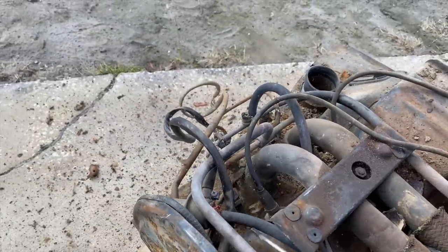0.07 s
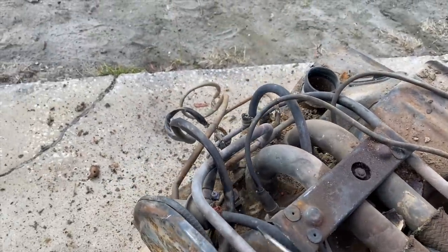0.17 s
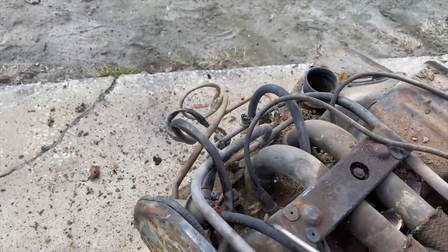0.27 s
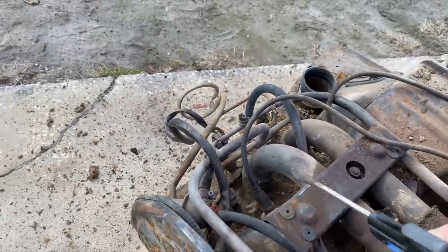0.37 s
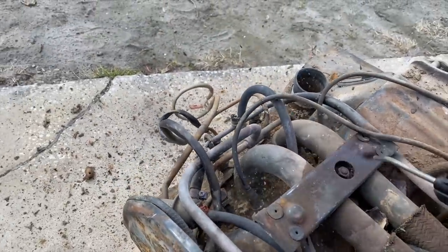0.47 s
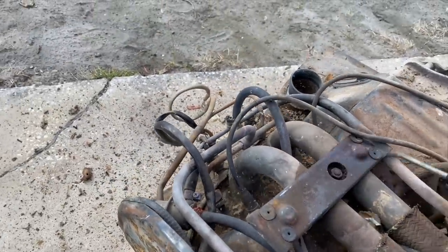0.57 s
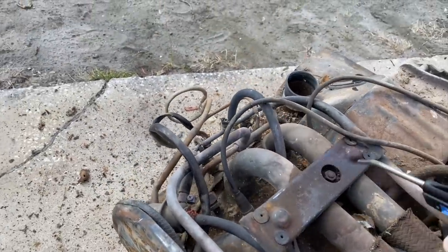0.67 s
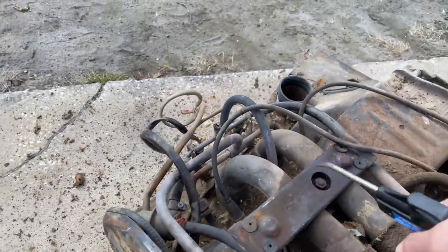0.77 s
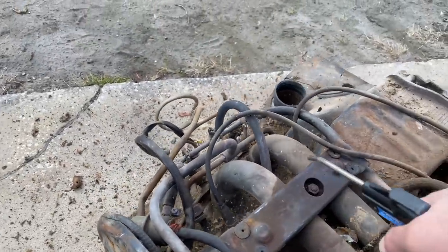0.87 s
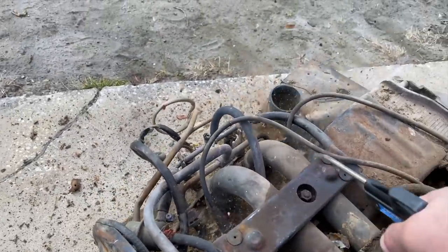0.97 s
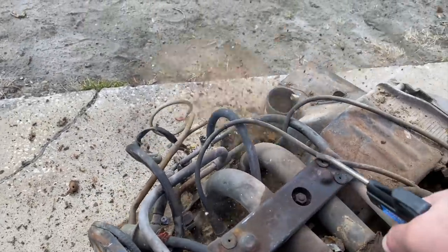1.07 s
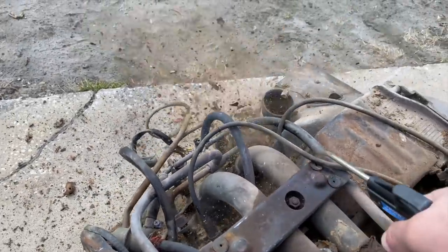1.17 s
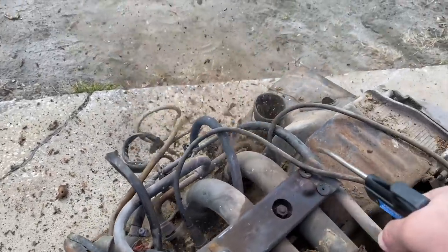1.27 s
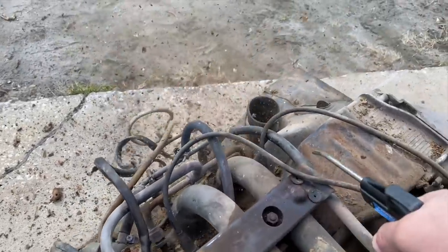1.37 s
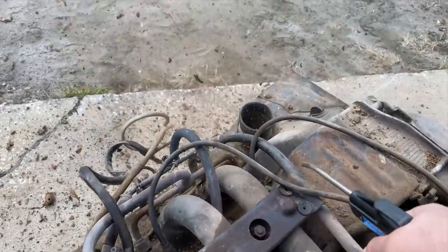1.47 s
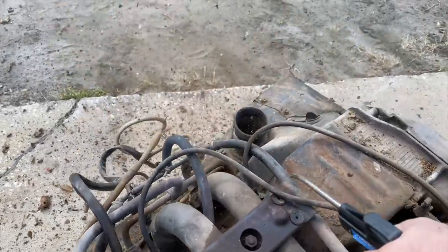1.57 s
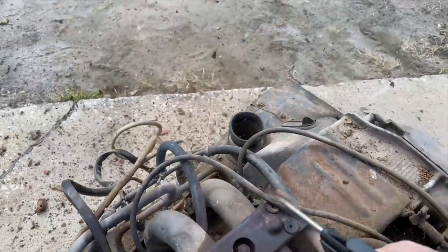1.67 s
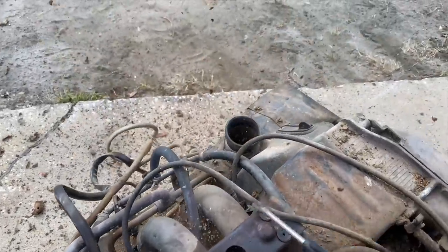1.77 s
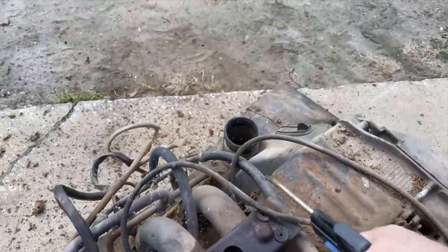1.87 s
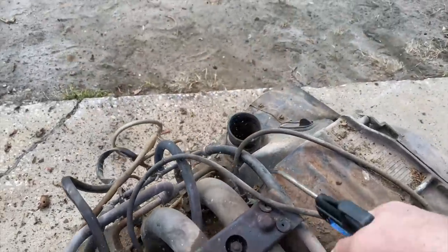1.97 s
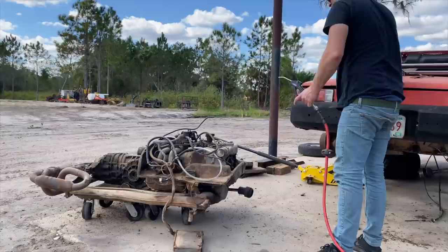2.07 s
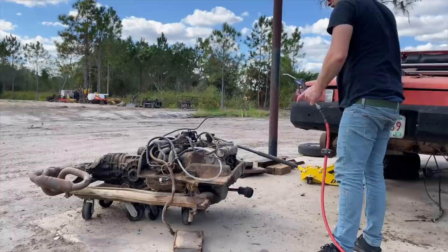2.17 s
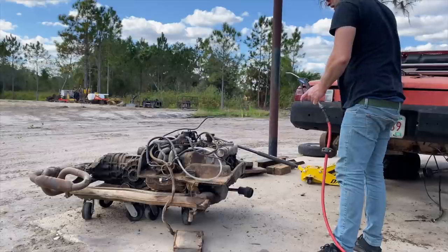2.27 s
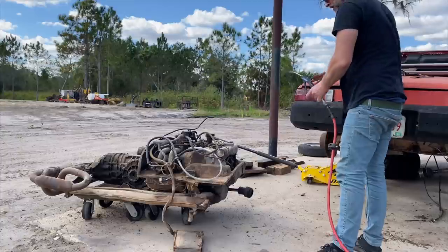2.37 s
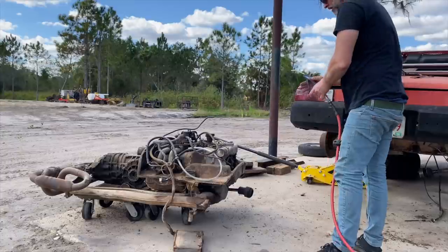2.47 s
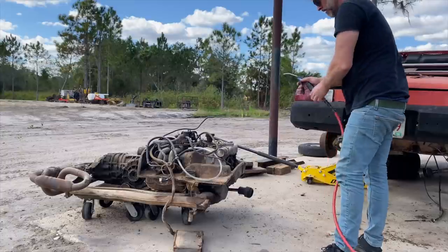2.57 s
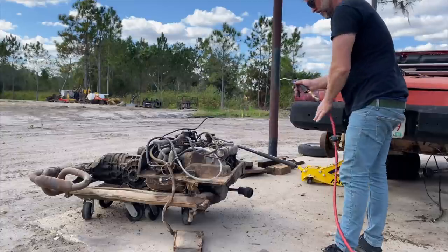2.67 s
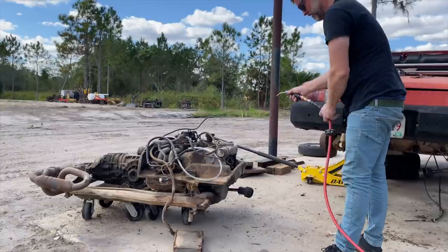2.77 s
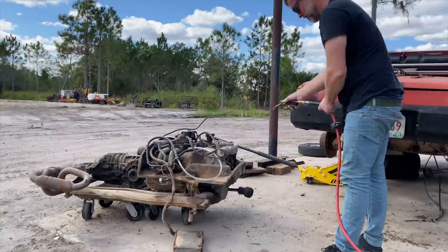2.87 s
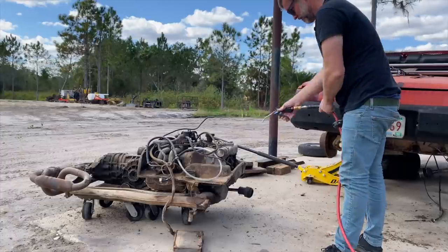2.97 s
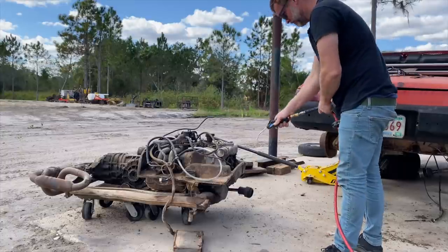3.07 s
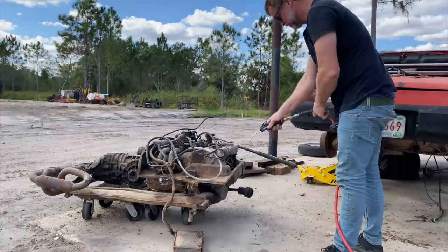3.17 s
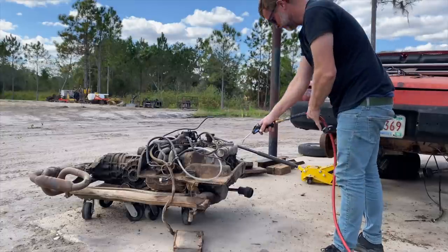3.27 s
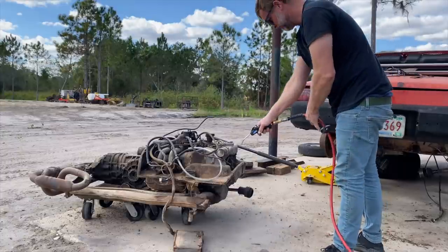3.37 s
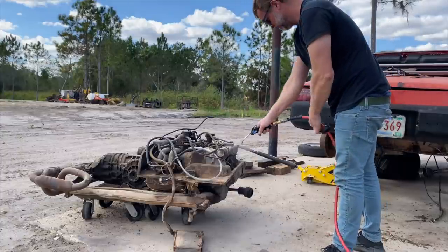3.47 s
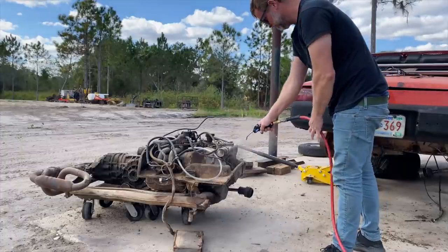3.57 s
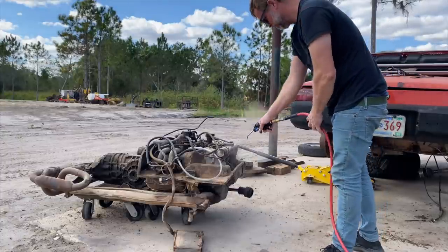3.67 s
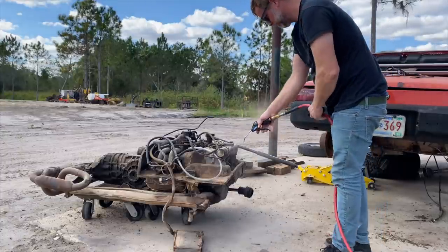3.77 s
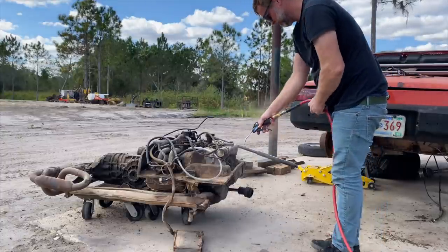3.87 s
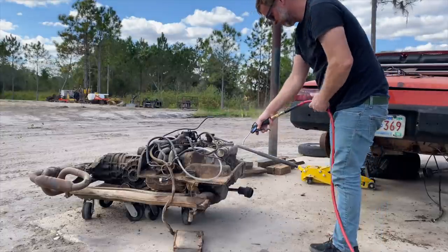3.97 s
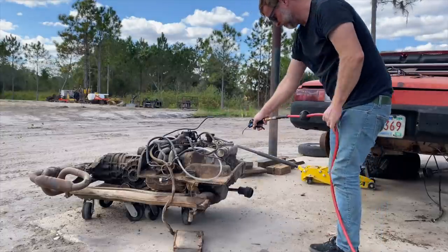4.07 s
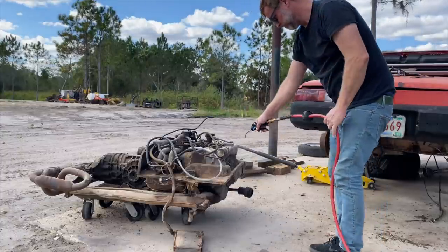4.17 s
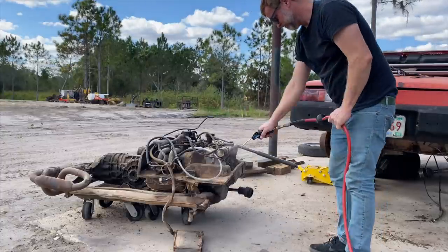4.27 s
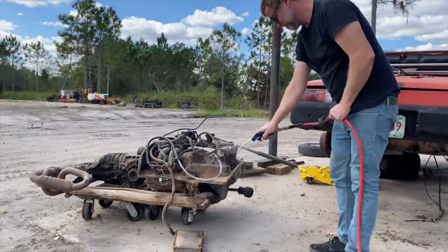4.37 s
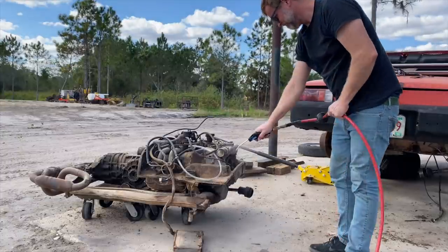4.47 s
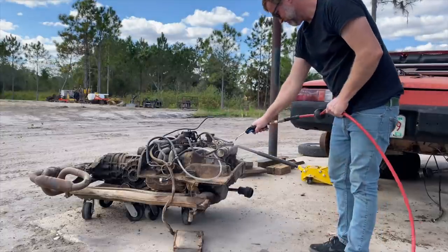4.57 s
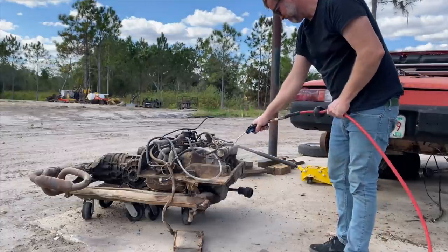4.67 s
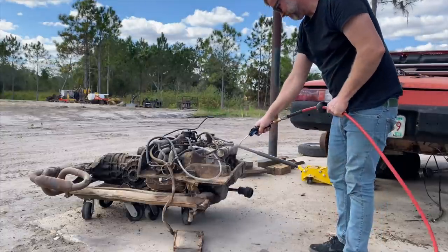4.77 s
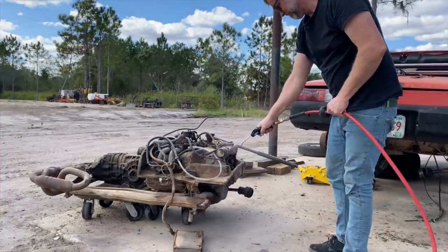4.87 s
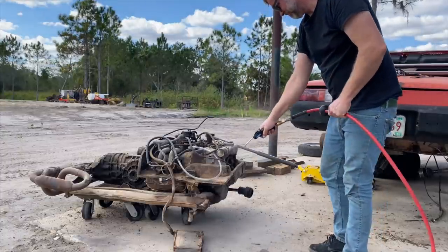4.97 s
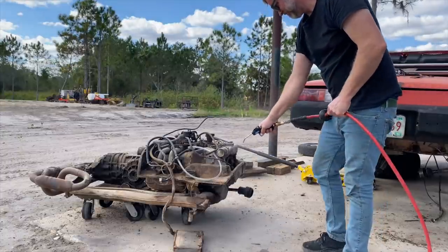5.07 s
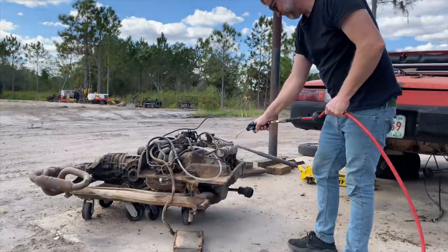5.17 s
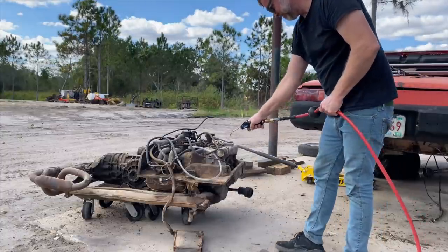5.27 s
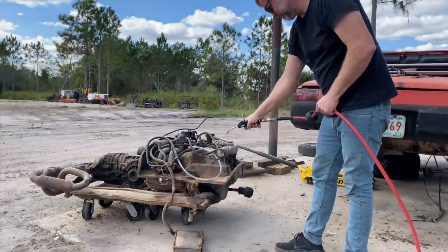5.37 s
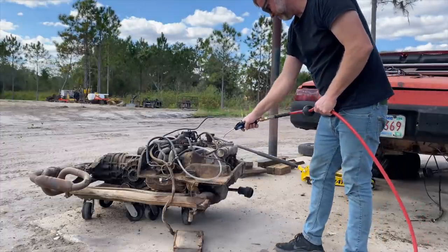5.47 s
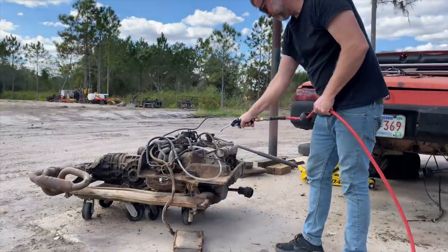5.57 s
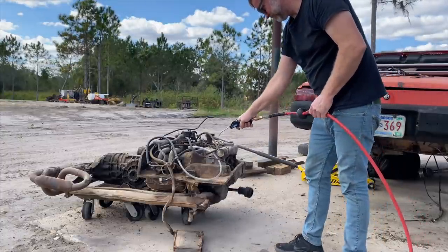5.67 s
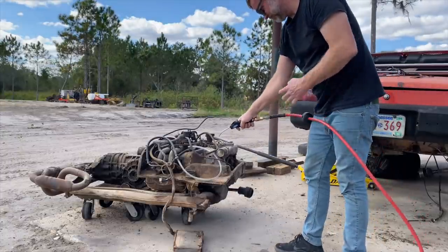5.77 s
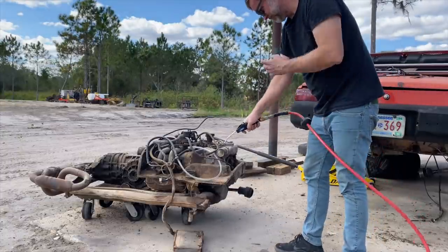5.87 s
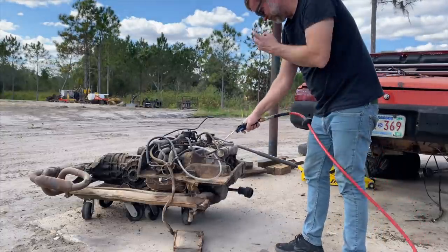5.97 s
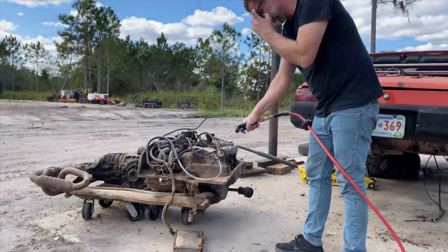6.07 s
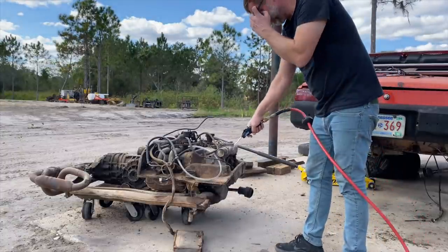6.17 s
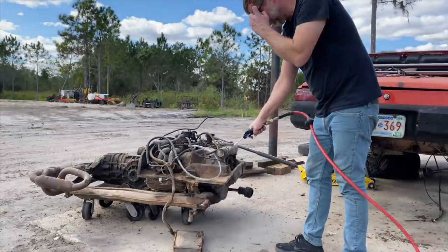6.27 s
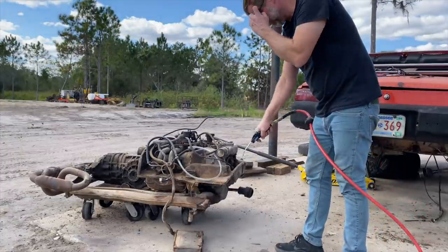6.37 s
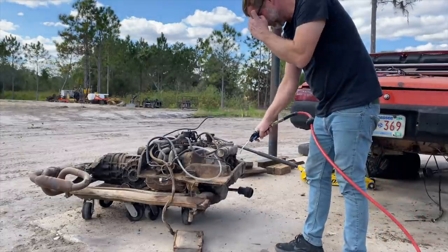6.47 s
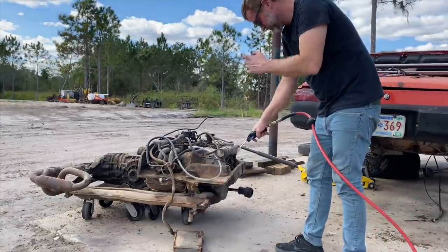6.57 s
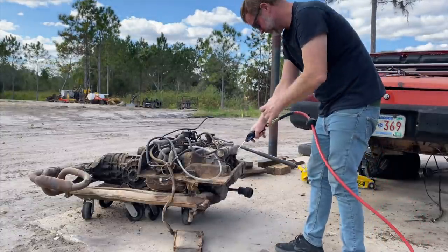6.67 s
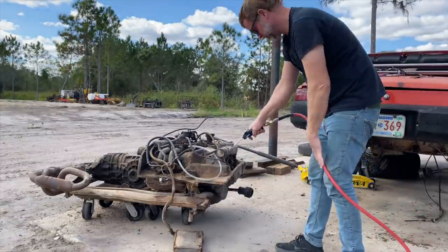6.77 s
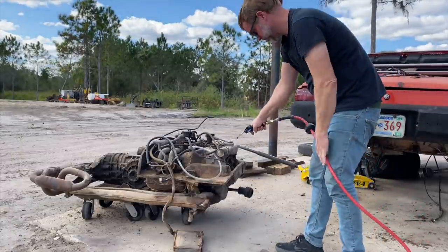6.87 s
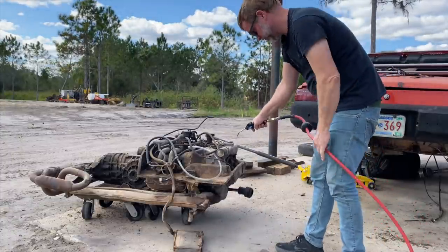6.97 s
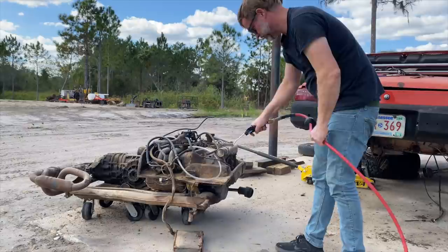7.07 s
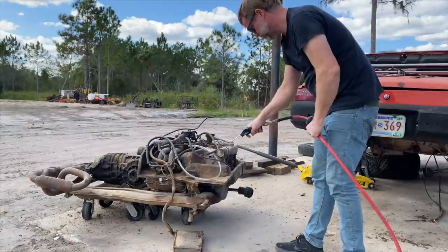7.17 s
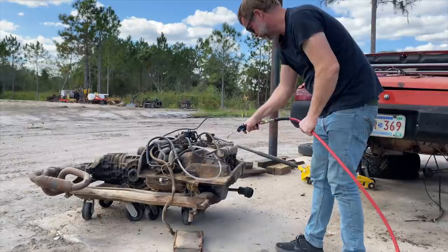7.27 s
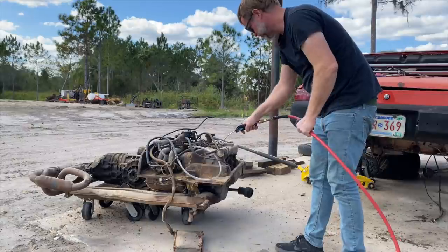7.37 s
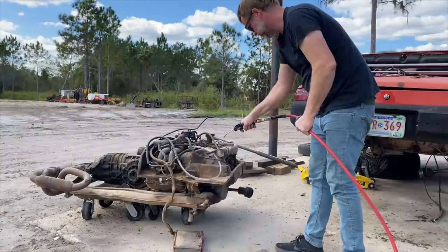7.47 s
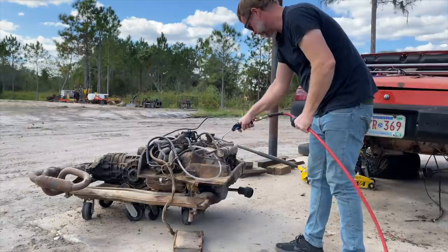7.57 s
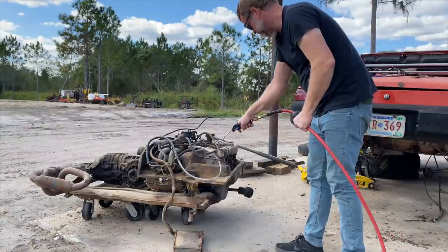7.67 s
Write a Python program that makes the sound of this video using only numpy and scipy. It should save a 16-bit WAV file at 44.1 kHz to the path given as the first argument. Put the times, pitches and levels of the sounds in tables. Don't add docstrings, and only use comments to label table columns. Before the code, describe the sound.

A compressed-air gun blows hard and close on a greasy engine, its bright hiss shifting as it crosses metal edges and hollows, with dull air thumps on the microphone. It cuts off around two seconds; small clicks tick in near quiet. Then a short burst, a medium burst, a brief rest, and a long sweeping blast heard from a few steps away in an open, dry yard.

```python
import sys
import numpy as np
from scipy import signal
from scipy.io import wavfile
from scipy.ndimage import uniform_filter1d

SR = 44100
rng = np.random.default_rng(int(sys.argv[2]) if len(sys.argv) > 2 else 0)


def magnitude_from_level(level_db):
    exponent = np.asarray(level_db, float) / 20
    return 10 ** exponent


def wav_record(signal):
    frames = np.transpose(np.atleast_2d(signal))
    bounded = np.clip(frames, -1, 1)
    quanta = np.round(bounded * 32767).astype(np.int16)
    wavfile.write(sys.argv[1], SR, quanta)


N = 341334

# frequency in Hz, density in dB per Hz.
YARD_SPECTRUM = [(200, -10.5), (400, -17.5), (750, -9.5), (1200, -15), (1700, -24), (3000, -30),
                 (6000, -42.5)]
LEAK_SPECTRUM = [(1200, -9.5), (2500, -7), (5000, -3.5), (8000, -4), (11800, -1), (14000, -7.5),
                 (16000, -30.5)]
WIND_SPECTRUM = [(25, -39.5), (45, -23), (70, -4), (100, 1), (150, -5), (250, -4.5), (500, -51)]
DRUM_SPECTRUM = [(100, -20), (170, -3), (250, 0), (380, -4), (600, -11), (1200, -30)]
NOZZLE_SPECTRUM = [(1500, -36.5), (3000, -19), (5600, -10.5), (9500, -6), (11800, 0), (13200, -4),
                   (14500, -7), (16000, -10.5)]
SPLASH_SPECTRUM = [(500, -35.5), (1300, -6), (2500, 0), (5600, -2.5), (7000, -2), (12000, -4.5)]
ROAR_SPECTRUM = [(150, -32.5), (350, -13.5), (600, -2.5), (1100, 3), (1500, -3), (2500, -9.5)]
# start in seconds, end in seconds, yard rumble in dB,
# its fading in dB per second, leak hiss in dB.
PAUSES = [
    (2.11, 2.733, -57, 15, -70.5),
    (2.92, 3.04, -75, .1, -60.5),
    (3.718, 4.103, -73, 9.5, -73.5),
    (4.12, 4.21, -79.5, -1, -76.5),
]
# start in seconds, length in seconds, leak hiss in dB, rumble in dB.
SPITS = [
    (2.466, 0.2, -66, -68),
    (2.6, .03, -59, -68),
    (2.65, 0.2, -71, -91),
    (3.021, .03, -61, -70),
    (3.725, 0.079, -70, -81),
    (3.92, 0.06, -74, -84),
    (4.1, .03, -68, -78),
    (4.18, 0.022, -71, -85),
]
# time in seconds, peak in dB, ring in Hz,
# share of bright click from 0 to 1, ring width in Hz.
TICKS = [(2.2004, -56, 1950, 0.7, 1500), (2.2205, -54, 2670, 0.9, 1500), (2.2565, -53, 1890, 0.9, 1500),
         (2.2864, -60, 1840, 0.9, 1500), (2.4605, -36, 3300, 0.4, 3000), (2.473, -43, 3600, 0.1, 3200),
         (2.5868, -37, 2200, 0.3, 1000), (2.5905, -32, 2200, 0.2, 1000), (2.5906, -34, 6000, 0.05, 2800),
         (2.5988, -25, 2400, 0.45, 950), (2.6005, -42, 6000, .1, 2000), (2.6042, -40, 2700, .1, 900),
         (2.6118, -29, 2400, 0.45, 1000), (2.612, -37, 5800, .1, 2500), (2.66, -44, 8500, 0.5, 2500),
         (2.488, -50, 3600, 0.1, 2000), (2.4925, -50, 2200, 0.4, 1500), (2.5425, -52, 11000, .8, 2000),
         (2.5505, -50, 10000, .8, 2000), (2.573, -50, 3500, 0.1, 3500), (2.581, -45, 2100, 0.5, 1000),
         (2.5955, -40, 9000, 0.5, 3000), (2.6085, -40, 8000, 0.5, 3000), (2.617, -44, 2700, .2, 1000),
         (2.62, -47, 4500, 0.3, 4000)]
# start in seconds, length in seconds, level in dB, centre in Hz, width in Hz.
RASPS = [
    (3.903, .009, -66, 12000, 5000),
    (3.903, 0.0069, -73, 2500, 2500),
    (3.917, .012, -64, 11000, 4500),
    (3.917, 0.035, -70, 5950, 250),
    (4.078, .014, -70, 5500, 3000),
    (4.099, .014, -68, 10000, 6020),
    (4.099, .013, -69, 3500, 4000),
    (4.17, 0.013, -64, 11500, 3500),
    (4.173, .016, -68, 5800, 1600),
]
# frequency in Hz, level in dB, 60 dB decay time in seconds.
PIPE_MODES = [
    (285, -65, 1.1),
    (600, -73, 1.1),
]
# time in seconds, length in seconds, level in dB.
WIND_GUSTS = [(.12, .24, -60), (.4, .15, -69), (0.51, .1, -48), (.66, .16, -56), (1.098, .14, -66),
              (1.675, 0.078, -50), (1.811, 0.071, -48), (2.198, 0.35, -57), (2.344, 0.15, -56),
              (2.467, .12, -60), (2.625, 0.51, -65), (3.074, 0.09, -63), (3.225, .1, -68), (2.9, .2, -66),
              (3.86, 0.3, -66), (4.032, 0.1, -55), (4.147, .2, -74), (4.278, 0.19, -59.5),
              (4.87, 0.18, -55), (5.502, .15, -75), (5.757, 0.22, -64), (5.902, 0.081, -48), (6.4, .3, -58),
              (6.56, 0.28, -50), (6.76, 0.28, -49), (6.953, 0.3, -49.5), (7.17, .16, -63), (7.288, .1, -58),
              (7.553, 0.31, -63), (7.68, 0.16, -47)]
# time in seconds, length in
# seconds, level in dB.
DRUMS = [(0.157, 0.3, -57), (0.555, 0.07, -42), (0.61, 0.1, -44), (0.661, .03, -43), (0.75, 0.15, -51.5),
         (1.087, 0.15, -54), (1.235, .1, -54), (1.672, 0.11, -44.5), (1.8, 0.051, -42.5), (2.4, .8, -63.5),
         (2.72, .14, -63), (3.32, 0.49, -55.5), (3.6, 0.25, -49), (4.287, 0.12, -44.5), (4.66, .14, -58),
         (4.744, 0.12, -52), (5.077, 0.4, -52), (5.364, 0.12, -57), (5.592, 0.19, -55), (5.897, 0.1, -68),
         (6.015, 0.062, -61), (6.125, 0.091, -53), (6.403, 0.14, -47), (6.534, 0.25, -52),
         (6.72, 0.18, -43.5), (6.776, 0.023, -40), (6.912, 0.3, -49.5), (7.3, 0.078, -58), (7.58, .1, -58),
         (7.71, .2, -60)]
# time in seconds, level in dB, starting pitch in Hz,
# clean thump relative to puff, final pitch as a share of the first.
SLAPS = [
    (0.4935, -30, 500, 4.5, .2),
    (0.5245, -29, 430, 3.4, .75),
    (0.537, -25, 750, .7, .7),
    (.566, -30, 450, 1.8, .8),
    (.598, -31, 900, .4, .6),
    (1.664, -35, 600, 1.5, .3),
    (1.8035, -35, 520, 3.5, .25),
]
# time in seconds, pitch in Hz, level in dB.
COVER_HUM = [(0, 1840, -46), (.7, 2050, -48), (.78, 2250, -44), (.87, 1950, -45), (1.1, 2150, -43),
             (1.42, 1780, -44), (1.62, 2100, -46), (1.72, 2000, -43), (1.83, 1850, -47), (1.93, 1700, -46),
             (2.05, 2150, -44), (2.11, 2050, -45)]
# start in seconds, length in seconds, level in dB,
# first pitch in Hz, last pitch in Hz.
SLIDES = [
    (6.28, .12, -42, 1900, 750),
    (6.11, .13, -43.5, 950, 550),
    (6.78, .1, -44, 1450, 1200),
    (7.06, .07, -43, 1900, 1300),
    (7.36, .06, -43, 2100, 1700),
    (4.37, .08, -46, 600, 1100),
    (1.5, .12, -42, 3700, 5000),
]
# start
# in seconds, length in seconds, level in dB, centre in Hz, width in Hz.
NEAR_CROSSINGS = [(.01, 0.074, -32.5, 5500, 3000), (.1, 0.25, -44, 2920, 350),
                  (.25, 0.14, -40.5, 1340, 540), (.29, 0.096, -44.5, 1190, 220),
                  (.385, 0.064, -42, 1450, 600), (.372, 0.11, -32, 5400, 2000),
                  (.494, 0.15, -21.5, 12900, 1490), (.68, 0.094, -35, 5800, 2800),
                  (.68, .1, -45, 3500, 300), (.494, .008, -34, 2200, 2000), (.537, .008, -33, 2200, 2000),
                  (.943, 0.2, -31.5, 12100, 1100), (1.163, 0.16, -31, 12600, 1100),
                  (1.047, 0.13, -39, 6050, 2500), (1.47, .15, -39, 4700, 1500),
                  (1.615, .08, -30, 12600, 1980), (1.694, 0.086, -45.5, 1920, 800),
                  (.52, 0.039, -37, 2300, 2000), (1.63, 0.045, -49, 1750, 500), (1.23, .3, -48, 1600, 400),
                  (2.58, 0.05, -60, 2400, 900), (2.525, .04, -66, 2000, 1200), (.352, .014, -36, 1230, 300),
                  (.53, .115, -39, 620, 550), (.405, .025, -38, 1350, 500), (.705, .045, -50, 500, 500),
                  (1.35, .25, -56, 420, 300)]
FAR_CROSSINGS = [(3.05, 0.1, -34, 5730, 700), (3.2, .36, -53, 1065, 296), (3.37, 0.22, -48.5, 245, 110),
                 (3.55, .155, -44, 248, 55), (3.555, .08, -49, 600, 90), (3.5, 0.19, -53, 440, 60),
                 (3.18, .12, -51, 550, 300), (3.41, 0.09, -47, 1000, 300), (3.185, .05, -49, 1020, 250),
                 (3.29, .05, -48, 1100, 200), (5.03, .16, -52, 240, 90), (4.27, .07, -44, 2000, 900),
                 (4.595, 0.056, -34, 2300, 1800), (5.395, 0.125, -33, 3000, 2600),
                 (5.646, 0.054, -35, 3080, 2500), (4.36, 0.15, -43, 575, 250),
                 (5.805, 0.052, -34.5, 2300, 2600), (5.906, 0.039, -36, 696, 500),
                 (5.978, 0.128, -33.5, 2500, 2520), (5.98, 0.044, -38, 1210, 700),
                 (6.465, 0.027, -38, 1300, 900), (6.236, 0.12, -36.5, 1950, 1470),
                 (6.55, 0.14, -47, 1020, 200), (6.771, 0.032, -36, 2860, 4000),
                 (7.018, .095, -37.5, 2600, 2600), (7.142, 0.04, -31, 2800, 3000),
                 (7.348, 0.14, -36, 3100, 2200), (7.49, .25, -45, 2660, 300),
                 (7.03, 0.19, -46.5, 2510, 160), (7.36, 0.1, -49, 2800, 350), (7.63, .11, -42.5, 1300, 600),
                 (5.02, .09, -49, 690, 300), (6.42, .06, -52, 620, 150), (4.695, .022, -38, 1800, 2000),
                 (4.322, .018, -36, 2600, 2500), (7.034, .012, -36, 2500, 600),
                 (7.235, .03, -40, 2500, 400), (6.19, .07, -51, 500, 250), (3.57, .09, -40, 6050, 400)]
# flow starts in seconds, full flow in seconds, flow begins to fall in seconds, first surge in dB, fall in dB
BURSTS = [
    (-.1, -.05, 2.105, 4, 4000),
    (2.727, 2.761, 2.9, 4, 709),
    (3.034, 3.063, 3.686, 8, 691),
    (4.209, 4.262, 7.8, 0.5, 700),
]
# time in seconds, hiss at the microphone in dB,
# aim at bare metal in dB, aim into hollows in dB.
AIM = [(0.0, -28, -9, -17.5), (.35, -27.5, -8, -23), (.56, -21, -10.5, -23), (.72, -26, -10.5, -26),
       (.9, -36, 1, -5.5), (1.3, -30.5, -3, -17), (1.7, -28, -10, -17.5), (1.94, -32.5, -4, -11.5),
       (2.1, -28.5, -4.5, -19), (2.76, -19, -9.5, -30), (2.9, -23, -12, -29), (3.13, -22, -11, -29),
       (3.22, -20, -12, -17), (3.7, -25, -11.5, -22), (4.3, -24.5, -7, -9), (5.1, -26.5, -9, -16),
       (6.5, -26, -10.5, -11), (7.74, -27.5, 0, -12.5)]
# time in seconds, length in
# seconds, hiss in dB, splash in dB, roar in dB.
SWEEPS = [(0.062, 0.11, 2.5, 6, 3), (0.198, 0.31, 3.5, -5.5, -2.5), (0.262, 0.1, -2, 9, 10),
          (0.397, 0.086, 2.5, 4, -1), (0.453, 0.033, 3.5, 4, -2), (0.498, 0.021, 1.5, -2, 11),
          (0.6, 0.21, -2.5, 0.5, 16.5), (0.695, .05, -3, -2, -8), (0.798, 0.15, -2.5, 5, 8),
          (0.906, 0.13, 3.5, -6, -22), (1.094, 0.24, 6, -4.5, -11.5), (1.56, 0.33, 0.5, 4, -7),
          (1.666, 0.16, 3, -3, 5), (1.796, .04, 4.5, -4, 5), (3.412, 0.36, 0.5, 3, 2.5),
          (3.53, .1, 0, 0, -4), (3.57, 0.15, 3, -5.5, 3), (3.67, .08, -.7, -2, 0), (3.0, .2, 1, 0, 0),
          (1.93, .12, 0, -2, 0),
          (4.33, 0.069, 3.5, 3.5, -0.3), (4.355, 0.056, 4, -12, -10), (4.515, 0.15, 0.5, 6.5, -0.5),
              (4.42, 0.13, -1, 2, -0.5), (4.7, .04, 1.5, 3.5, 0), (4.75, 0.096, 1, -1, -8),
              (4.85, 0.8, 1.5, -3.5, 1), (5.11, 0.38, -1, -1.5, 0), (5.25, 0.2, 1, 8.5, 4),
              (6.17, .1, 0, 2, 0), (5.39, 0.18, -2.5, 4, 4.5), (5.451, 0.12, 5, 4, -0.5),
              (5.57, .14, -1, 2.5, 2), (5.65, .05, 2, -6, -3), (5.68, 0.077, -1, 7, 8),
              (5.82, 0.069, -1, 10, 7), (5.865, 0.14, 3, -5, -6), (5.93, .06, 1.5, -1, 3),
              (6.012, 0.11, 3.5, 9, -4), (6.065, 0.09, 3.5, 8, -3), (6.19, 0.15, 0, -1, -4),
              (6.3, 0.12, 2, 6.5, -6), (6.42, 0.096, -1.5, 0, -8), (6.94, 0.18, -1.5, -3, -2),
              (6.78, 0.046, 2.5, 1, -2), (7.17, 0.19, 5, -1, -8), (7.21, .03, -1, -4, -5),
              (7.26, 0.09, 2, 4.5, -4.5), (7.42, 0.14, -3, 8, -1), (7.54, .12, 0, -1, -6),
              (6.55, .1, 0, 0, -3), (4.66, .1, 0, 0, -4)]
# time in seconds, centre in Hz.
SPLITS = [(.14, 5500), (1.02, 6300), (1.42, 7000), (1.56, 6300), (1.56, 8400), (1.6, 5200), (1.6, 14500),
          (2.02, 5000), (2.02, 7600), (4.27, 6700), (4.27, 15200), (4.42, 8000), (4.44, 7000), (4.51, 7000),
          (5.04, 12800), (5.11, 5800), (5.13, 7000), (5.29, 7300), (5.72, 4700), (5.72, 14200),
          (6.34, 4700), (6.43, 7000), (6.43, 10500), (6.74, 5200)]


def read(points, hz):
    f, value = np.transpose(points)
    return np.interp(np.log(hz + 1), np.log(f + 1), value, -90, -90)


def evened(x):
    return x / np.sqrt(np.mean(x ** 2) + 1e-20)


def turbulence(spectrum, size, patchy_db, flutter_db, streak_db=3.0):
    hop = size // 4
    frames, hz = N // hop + 5, np.fft.rfftfreq(size, 1 / SR)
    a, b, patches, streaks = rng.standard_normal((frames, len(hz), 4)).T
    streaks = uniform_filter1d(streaks, size=2, axis=0)
    streaks = evened(uniform_filter1d(streaks, size=20, axis=1))
    patches = uniform_filter1d(patches, size=size // 48, axis=0)
    patches = evened(uniform_filter1d(patches, size=12288 // size, axis=1))
    flutter = evened(uniform_filter1d(rng.standard_normal(frames), size=2048 // size))
    drift_db = patchy_db * patches + flutter_db * flutter + streak_db * streaks
    z = (a + 1j * b) * magnitude_from_level(read(spectrum, hz))[:, None] * magnitude_from_level(drift_db)
    return evened(signal.istft(z, nperseg=size, noverlap=size - hop)[1][:N])


def resonate(x, hz, width):
    turn = np.exp(2j * np.pi * np.cumsum(hz * np.ones(len(x))) / SR)
    r = np.exp(-np.pi * width / SR)
    return (turn * signal.lfilter([1], [1, -2 * r, r * r], x / turn)).real


def bumps(rows, heights, rise=0.51):
    t = np.arange(0, N + 16, 16)[:, None] / SR
    s, length = np.transpose(rows)[:2]
    away = np.where(t < s, (s - t) / rise, (t - s) / (1 - rise)) / length
    swells = np.cos(np.pi / 2 * np.minimum(away, 1)) ** 2
    return np.interp(np.arange(N) / SR, t[:, 0], swells @ heights)


def eddies(rows, glide):
    out, noise = np.zeros(N), rng.standard_normal(N)
    for s, length, db, hz, width in rows:
        start = round(s * SR)
        part = out[start:][:round(length * SR)]
        drifting = hz + glide * width ** 2 / 2000 * np.linspace(-1, 1, len(part))
        shed = evened(resonate(noise[start:][:len(part)], drifting, width))
        part += magnitude_from_level(db) * shed * signal.windows.tukey(len(part), 0.32)
    return out


def valve():
    opening_db_per_s, surge_s = 481.5, .04
    t, gain = np.arange(N) / SR, np.zeros(N)
    for start, full, stop, surge_db, closing in BURSTS:
        db = surge_db * np.exp(-abs(t - full) / surge_s)
        db = db - opening_db_per_s * np.maximum(full - t, 0)
        db = db - closing * np.maximum(t - stop, 0)
        gain += np.clip((t - start) / .004, 0, 1) * magnitude_from_level(db)
    return gain


def aimed(k):
    sweeps, aim = np.array(SWEEPS), np.transpose(AIM)
    return np.interp(np.arange(N) / SR, aim[0], aim[k]) + bumps(sweeps, sweeps[:, k + 1])


def yard():
    rumble = turbulence(YARD_SPECTRUM, size=1024, patchy_db=.7, flutter_db=.8, streak_db=2)
    leak = turbulence(LEAK_SPECTRUM, size=256, patchy_db=.5, flutter_db=.8)
    t = np.arange(N) / SR
    spit_hiss, spit_low = (bumps(SPITS, magnitude_from_level(db), rise=.03) for db in np.transpose(SPITS)[2:])
    out = spit_hiss * leak + spit_low * rumble
    for start, end, yard_db, fading, leak_db in PAUSES:
        gate = np.clip(np.minimum(t - start, end - t) / .01 + 1, 0, 1)
        rumble_level = magnitude_from_level(yard_db - fading * np.clip(t - start, 0, 1))
        out = out + gate * (rumble_level * rumble + magnitude_from_level(leak_db) * leak)
    return out


def ticks():
    out, t = np.zeros(N), np.arange(600) / SR
    scatter = rng.standard_normal((len(TICKS), len(t)))
    cracks = (t == 0) + 0.087 * scatter * magnitude_from_level(-60 * t / 0.0036)
    for (s, db, hz, bright, width), crack in zip(TICKS, cracks):
        snap = resonate(crack, 10500, 6500) + .28 * resonate(crack, 5300, 3500)
        ring = resonate(crack, hz, width)
        click = 1.7 * bright * snap / abs(snap).max()
        out[round(s * SR):][:len(t)] += magnitude_from_level(db) * (click + (1 - bright) * ring / abs(ring).max())
    return out


def grit():
    return eddies(RASPS, glide=0)


def pipe():
    t = np.maximum(np.arange(N) / SR - 3.69, 0)
    return sum(magnitude_from_level(db - 60 * t / t60) * np.sin(2 * np.pi * hz * t) for hz, db, t60 in PIPE_MODES)


def buffet():
    hum = turbulence(DRUM_SPECTRUM, size=1024, patchy_db=.8, flutter_db=1.6, streak_db=1.2)
    wind = turbulence(WIND_SPECTRUM, size=2048, patchy_db=1, flutter_db=2, streak_db=0.5)
    idle_db, below_hiss_db, calm_db = -76.5, -42.5, -75
    drumming = magnitude_from_level(idle_db) + valve() * magnitude_from_level(aimed(1) + below_hiss_db)
    drumming = drumming + bumps(DRUMS, magnitude_from_level(np.array(DRUMS)[:, 2]))
    gusting = magnitude_from_level(calm_db) + bumps(WIND_GUSTS, magnitude_from_level(np.array(WIND_GUSTS)[:, 2]))
    return drumming * hum + gusting * wind


def slaps():
    out, t = np.zeros(N), np.arange(2000) / SR
    puffs = rng.standard_normal((len(SLAPS), len(t)))
    shape = (1 - np.exp(-t / 0.0024)) * magnitude_from_level(-60 * t / 0.035)
    for (s, db, hz, thump, low), puff in zip(SLAPS, puffs):
        sinking = hz * (low + (1 - low) * np.exp(-t / .008))
        air = evened(resonate(puff, sinking + 250, 1300))
        tone = thump * np.sin(2 * np.pi * np.cumsum(sinking) / SR)
        out[round(s * SR):][:len(t)] += magnitude_from_level(db) * (air + tone) * shape
    return out


def cover():
    t, noise = np.arange(N) / SR, rng.standard_normal(N)
    s, hz, db = np.transpose(COVER_HUM)
    close_by = np.clip((2.11 - t) / .01, 0, 1)
    out = evened(resonate(noise, np.interp(t, s, hz), 900)) * magnitude_from_level(np.interp(t, s, db)) * close_by
    for s, length, db, from_hz, to_hz in SLIDES:
        start = round(s * SR)
        part = out[start:][:round(length * SR)]
        hz = np.geomspace(from_hz, to_hz, len(part))
        whistle = evened(resonate(noise[start:][:len(part)], hz, .3 * hz.mean()))
        part += magnitude_from_level(db) * whistle * signal.windows.tukey(len(part), .5)
    return out


def crossings():
    return eddies(NEAR_CROSSINGS, glide=0.39) + eddies(FAR_CROSSINGS, glide=.02)


def jet():
    nozzle = turbulence(NOZZLE_SPECTRUM, size=512, patchy_db=1.43, flutter_db=0.32, streak_db=2.8)
    splash = turbulence(SPLASH_SPECTRUM, size=512, patchy_db=1.2, flutter_db=1.2, streak_db=2.6)
    roar = turbulence(ROAR_SPECTRUM, size=1024, patchy_db=1.2, flutter_db=.7, streak_db=2.6)
    hiss, metal, hollows = (magnitude_from_level(aimed(k)) for k in range(1, 4))
    flow = valve()
    filling = np.minimum(flow, 1) ** 1.4
    return flow * hiss * (0.95 * nozzle + 0.79 * metal * splash + 0.66 * hollows * filling * roar)


def scene():
    background = yard() + ticks() + grit() + pipe()
    mono = background + buffet() + slaps() + cover() + crossings() + jet()
    return np.array([mono, mono])


def splits(mono, shift=255):
    hz, t, z = signal.stft(mono[shift:], SR, nperseg=2048, noverlap=1024)
    mask = np.zeros(z.shape)
    for s, centre in SPLITS:
        mask[abs(hz - centre) < .105 * centre, np.argmin(abs(t - s))] = magnitude_from_level(-0.5)
    scrambled = z * mask * np.exp(2j * np.pi * rng.random(z.shape))
    side = signal.istft(scrambled, SR, nperseg=2048, noverlap=1024)[1]
    return np.append(np.zeros(shift), side)[:N]


def top_cut(x):
    return signal.sosfilt(signal.butter(12, 17060, fs=SR, output="sos"), x)


def record(dry):
    low_cut = signal.lfilter(*signal.butter(3, 52, "high", fs=SR), dry)
    edge = signal.firwin(2047, 15770, window=("kaiser", 10), fs=SR)
    parted = low_cut + np.outer([1, -1], splits(low_cut[0]))
    mix = signal.oaconvolve(parted, edge[None], "same")
    return top_cut(mix)


dry = scene()
out = record(dry)
wav_record(out)
```